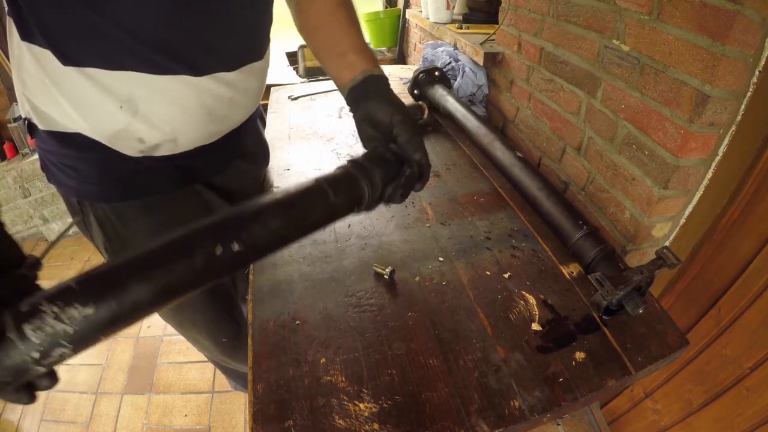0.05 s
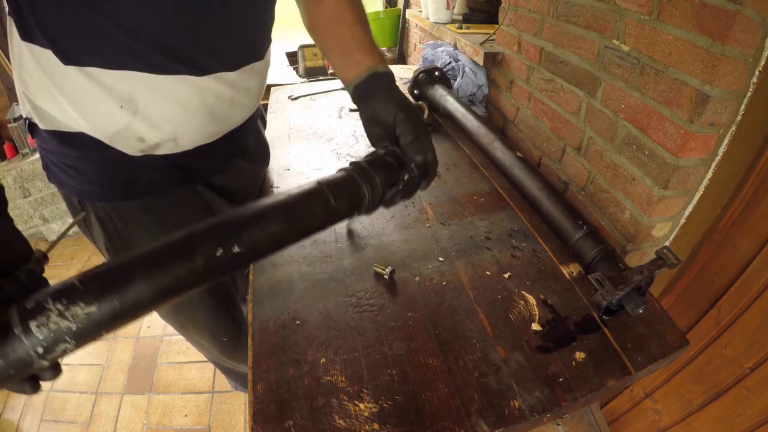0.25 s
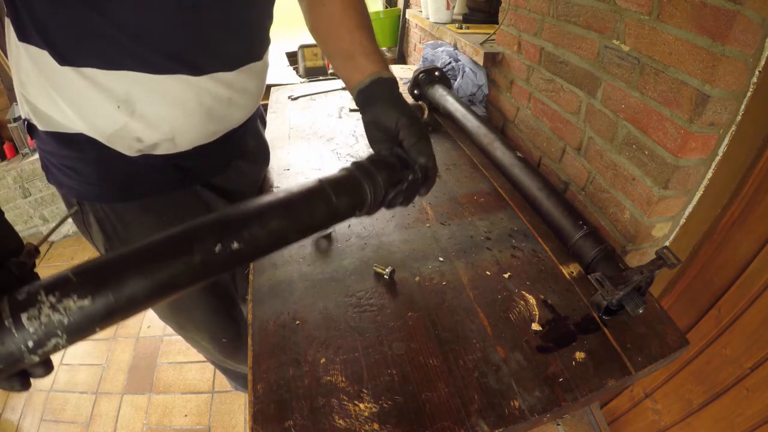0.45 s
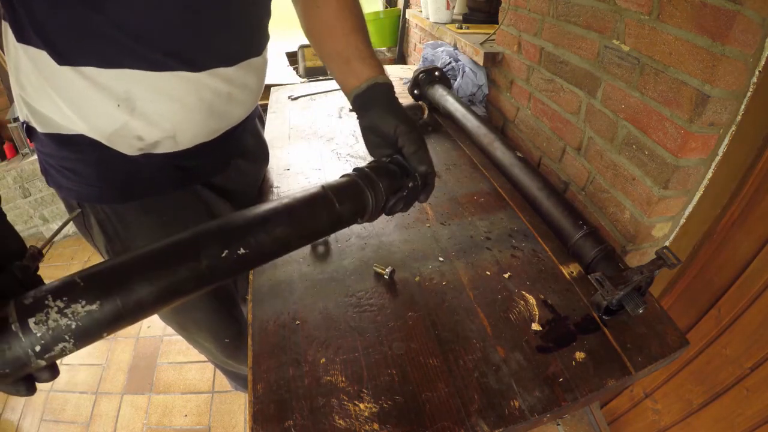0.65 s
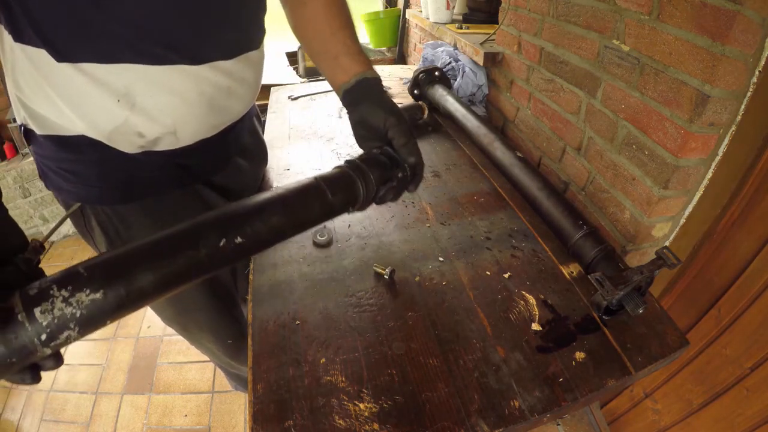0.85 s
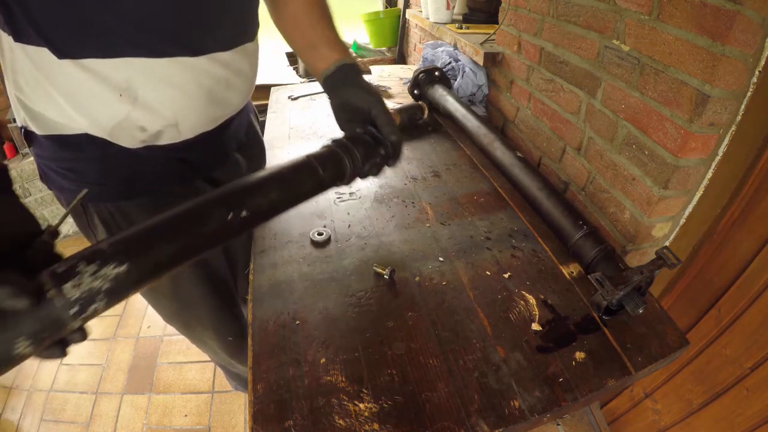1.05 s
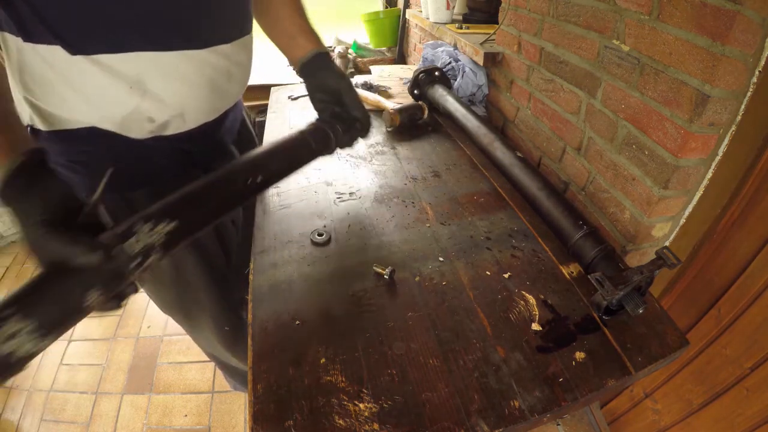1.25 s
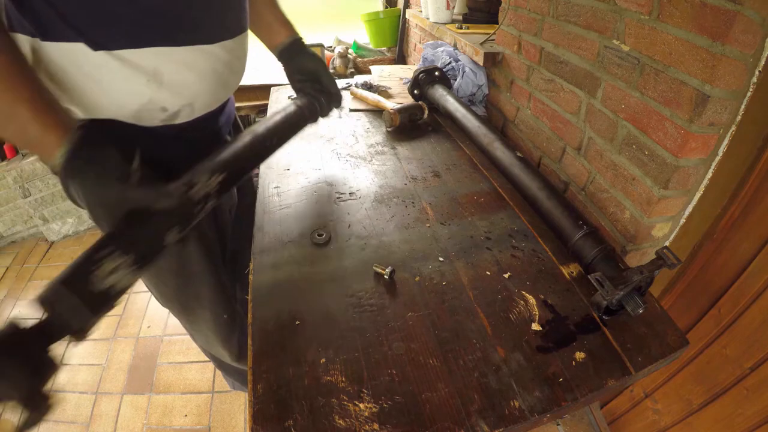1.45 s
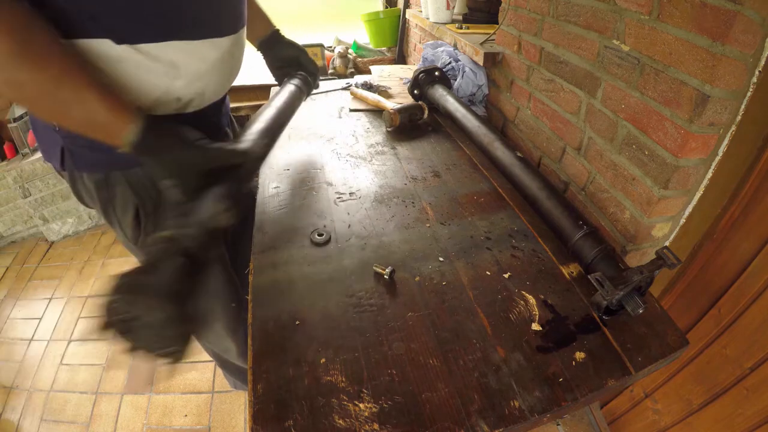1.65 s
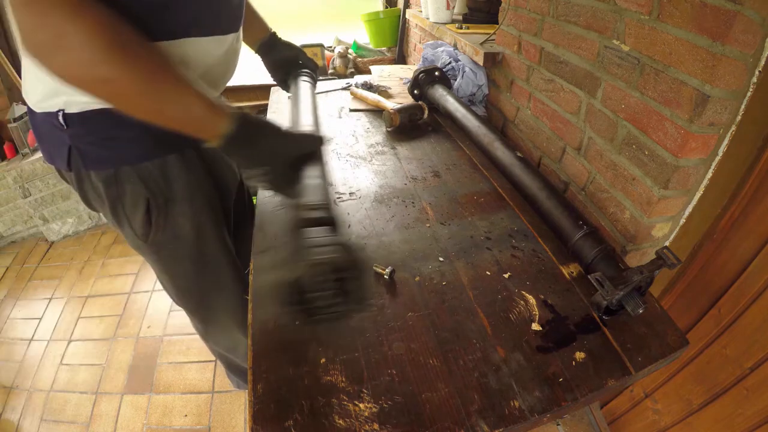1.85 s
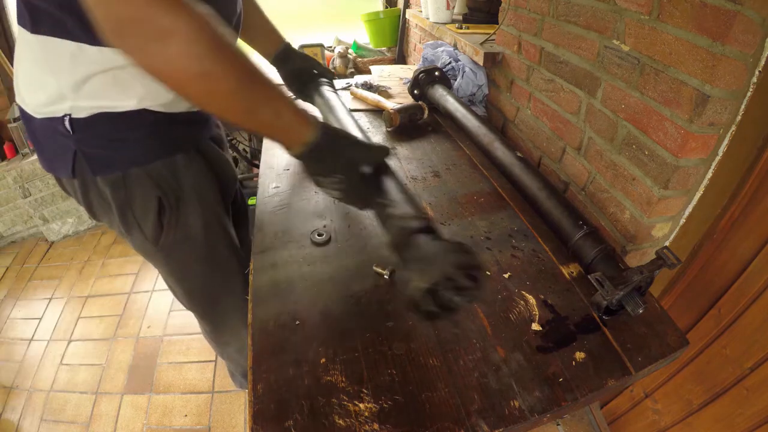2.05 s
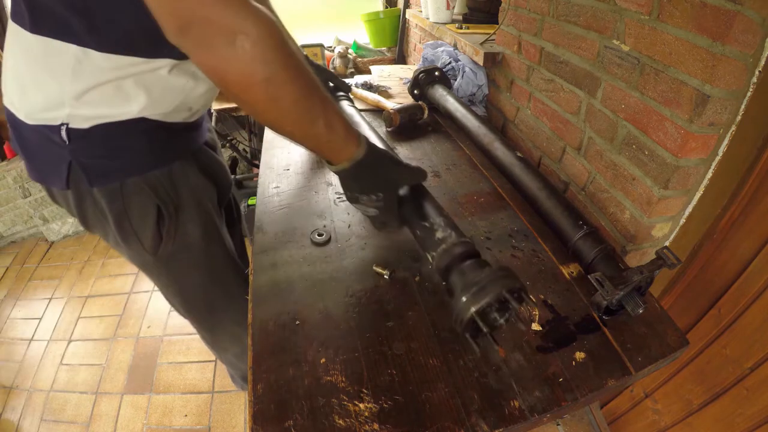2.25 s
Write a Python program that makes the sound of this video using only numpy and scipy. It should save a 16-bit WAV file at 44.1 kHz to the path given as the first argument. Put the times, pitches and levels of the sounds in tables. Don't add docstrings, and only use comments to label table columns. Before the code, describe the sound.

A steel washer falls onto a wooden bench. Over quiet room rumble, hiss and a very faint pulsed electronic whine, a bright clink off a pipe comes at 0.2 s with a softer touch after it. Hard clicks and woody knocks follow at 0.3-0.4 s, then soft rocking rattles until 1.25 s, strongest near 1.0 and 1.2. Short room tail; only background afterwards, with a barely audible dull bump near 2.2 s.

```python
import sys
import numpy as np
from scipy import signal
from scipy.fft import rfft, irfft
from scipy.io import wavfile
from scipy.ndimage import uniform_filter1d

SR = 44100
rng = np.random.default_rng(int(sys.argv[2]) if len(sys.argv) > 2 else 0)


def rack_gain(trim_db):
    fader = np.asarray(trim_db, float)
    return 10 ** (fader / 20)


def put_to_file(sound):
    columns = np.atleast_2d(sound).T
    safe = np.clip(columns, -1, 1)
    whole_steps = np.round(safe * 32767)
    wavfile.write(sys.argv[1], SR, whole_steps.astype(np.int16))


N = 101429

# (frequency [Hz], density [dB per Hz])
FLOOR_SPECTRUM = [(12, -32), (20, 6), (82, -4), (139, -11.5), (205, -14.5), (457, -21), (5850, -30),
                  (13800, -38.5), (15000, -40.5)]
# (time [s], length [s], depth [dB])
HISS_DIPS = [(.035, .025, -5), (.192, .015, -10), (.895, .022, -9), (.96, .022, -5), (1.448, .022, -9),
             (1.568, .045, -12), (1.64, .022, -9), (1.685, .022, -9), (2.11, .024, -9)]
# (frequency [Hz], rise over a burst [Hz], level [dB])
WHINE_TONES = [(14650, 130, -76), (10790, 40, -86)]
# (time [s], level [dB], rise [s], contact length [s], hardness [Hz])
CLINKS = [
    (.2017, -19.5, 0.00013, 0.00014, 10900),
    (.2132, -29.5, 0.00025, 0.00028, 1790),
]
# (time [s], level [dB], rise [s], contact length [s], hardness [Hz])
ROCKS = [(.2975, -33, 0.0013, 0.021, 1740), (.336, -34.5, 0.0024, 0.0076, 3450),
         (.362, -34.5, 0.0019, 0.022, 2940), (.425, -47, 0.0021, 0.041, 1850),
         (.455, -54.5, 0.0046, 0.011, 2310), (.495, -55, 0.0017, 0.021, 1450),
         (.595, -42, 0.0059, 0.025, 1900), (.706, -42, 0.0027, 0.02, 3780),
         (.808, -46, 0.0046, 0.036, 3430), (.902, -42, 0.002, 0.038, 4860),
         (.988, -37.5, 0.0048, 0.014, 4630), (1.056, -41.5, 0.0013, 0.016, 3370),
         (1.1, -55.5, 0.0057, 0.021, 2470), (1.161, -50.5, 0.0062, 0.026, 2310),
         (1.2045, -36.5, 0.0006, 0.015, 4170)]
# (time [s], level [dB], push length [s])
THUMPS = [(0.2984, -38.5, 0.00077), (0.303, -34, 0.0033), (.333, -41, 0.00085), (.362, -37.5, 0.0011),
          (0.438, -44, 0.00086), (.82, -55.5, 0.0034), (0.999, -61, 0.0012), (1.069, -57, 0.00087),
          (1.151, -59, 0.0025), (1.244, -53, 0.0039), (2.189, -50, 0.02)]
# (time [s], level [dB], rise [s], contact length [s], hardness [Hz])
BOUNCES = [(.333, -37.5, 0.00027, 0.00026, 6140), (.361, -21, 0.00022, 0.00021, 5870),
           (.3645, -21.5, 0.00026, 0.00027, 4050), (.369, -27.5, 0.00026, 0.00021, 3770),
           (.398, -42.5, .0003, .0003, 7100)]
# (level [dB], t60 [s])
STEEL_HZ = [1916, 2300, 2859, 3208, 3480, 3763, 4550, 4969, 5590, 6500, 6864, 8059, 9351, 11000]
STEEL_DECAY = [(-16.5, .04), (-5.5, 0.023), (-22, 0.12), (-18, 0.034), (6.5, 0.02), (-8, 0.04), (-6, 0.035),
               (1, 0.019), (-10, 0.033), (-3.5, .02), (-21, 0.16), (-18.5, 0.033), (-33, 0.02),
               (-23.5, .02)]
# (level [dB], t60 [s])
EDGE_HZ = [1836, 2008, 2400, 2794, 3182, 3316, 3575, 3745, 4533, 5000, 5582, 7300, 8400]
EDGE_DECAY = [(-32, 0.13), (-9.5, 0.024), (0, 0.01), (-15, 0.065), (-11, 0.056), (1.5, 0.033), (-14, 0.09),
              (-5.5, 0.062), (-6, 0.034), (-24, 0.027), (-17, 0.044), (-15, 0.041), (-16, .03)]
# (level [dB], t60 [s])
BOARDS_HZ = [474, 790, 921, 1285, 1556, 1760, 2008, 2202, 2380, 2600, 2730, 2865, 3340, 3690]
BOARDS_DECAY = [(-16, 0.16), (-21.5, 0.12), (-14.5, 0.13), (-19, 0.18), (-19.5, 0.16), (-33, 0.049),
                (-37, 0.053), (-16.5, 0.063), (-2, 0.024), (-15, .02), (-11, 0.054), (-9.5, 0.059),
                (-15, .05), (-26, 0.072)]
# (level [dB], t60 [s])
TOP_HZ = [60, 146, 163, 215, 385, 474, 700, 790, 860]
TOP_DECAY = [(-6.5, 1), (0, 0.58), (-0.5, 0.153), (-7.5, 0.066), (-11.5, 0.14), (-8.5, 0.13), (-20.5, 0.14),
             (-3, 0.067), (-17, 0.19)]


def low(x, hz, order=2, kind="low"):
    return signal.sosfilt(signal.butter(order, min(hz, .45 * SR), kind, fs=SR, output="sos"), x)


def walk(rate):
    hold = int(SR / rate)
    steps = np.repeat(rng.standard_normal(N // hold + 1), hold)
    return 1.3 * uniform_filter1d(uniform_filter1d(steps, hold), hold)[:N]


def floor():
    floor_db, hiss_top_hz = -58.5, 15250
    rumble_walk_db, hiss_walk_db = 1.5, .8
    f = np.arange(N // 2 + 1) * SR / N + 1e-3
    hz, density_db = np.array(FLOOR_SPECTRUM).T
    spectrum_db = np.interp(np.log(f), np.log(hz), density_db) - 22 * (f > hiss_top_hz)
    spectrum = rfft(rng.standard_normal(N)) * rack_gain(spectrum_db)
    out = 0
    shared = walk(29.79)
    for octave in range(10):
        share = np.clip(1 - np.abs(np.log2(f / 30) - octave), 0, 1)
        if octave < 4:
            db = rumble_walk_db * walk(8.36)
        else:
            db = hiss_walk_db * shared * octave / 9 + .5 * walk(11.97)
        out = out + rack_gain(db) * irfft(spectrum * share, N)
    return out * rack_gain(floor_db) / out.std()


def chatter():
    center_hz, level_db, walk_db = 6120, -86, 2.5
    edges_hz = [center_hz - 300, center_hz + 300]
    band_pass = signal.butter(2, edges_hz, "band", fs=SR, output="sos")
    band = signal.sosfilt(band_pass, rng.standard_normal(N))
    return band / band.std() * rack_gain(level_db + walk_db * (walk(6.5) + walk(150)))


def whine():
    period_s, start_s, on_s = 1001 / 15000, .0075, .036
    progress = (np.arange(N) / SR - start_s) % period_s / on_s
    gate = (progress < 1) * (np.abs(progress - .5) > .03) * 1.
    gate = uniform_filter1d(gate, 40)
    tones = np.zeros(N)
    for hz, rise_hz, db in WHINE_TONES:
        cycles = np.cumsum(hz + rise_hz * np.minimum(progress, 1)) / SR
        tones += rack_gain(db) * np.sqrt(2) * np.sin(2 * np.pi * cycles)
    return gate * tones


def starved(x):
    t = np.arange(N) / SR
    db = sum(depth_db * np.exp(-((t - s) / length * 2) ** 4) for s, length, depth_db in HISS_DIPS)
    treble = signal.sosfiltfilt(signal.butter(1, 3500, "high", fs=SR, output="sos"), x)
    return x + (rack_gain(db) - 1) * treble


def table(hz, rows):
    return [(f, *row) for f, row in zip(hz, rows)]


def ring(x, modes):
    out = 0
    for hz, db, t60 in modes:
        pole = np.exp(2j * np.pi * hz / SR - np.log(1000) / (t60 * SR))
        out = out + rack_gain(db) * signal.lfilter([1], [1, -pole], x).imag
    return out


def tail(t60, hz):
    t = np.arange(SR // 4) / SR
    noise = low(rng.standard_normal(len(t)), hz) * rack_gain(-60 * t / t60)
    return noise / np.sqrt(np.sum(noise ** 2))


def rattle(events, modes, crack_db, tail_db, t60, tail_hz, per_s):
    click_scatter_db, strike_scatter_db, detune = 2, 1.5, .004
    crack_t60_s = 0.017
    out, t = np.zeros(N), np.arange(SR // 3) / SR
    for s, db, rise, length, hz in events:
        chance, side, size = rng.random((len(t), 3)).T
        heights = np.sign(side - .5) * rack_gain(-click_scatter_db * np.log(size + 1e-9))
        clicks = (chance < per_s / SR) * heights
        clicks[0] = 2
        fade = np.exp(-(np.maximum(t - rise, 0) / length) ** 2)
        shape = np.minimum((t + 1 / SR) / rise, 1) * fade
        force = low(clicks * shape, hz)
        force *= rack_gain(db) * np.sqrt(np.sum(shape ** 2) / np.sum(force ** 2))
        scatter = rng.standard_normal((len(modes), 2))
        spot = [(f * (1 + detune * a), d + strike_scatter_db * b, r)
                for (f, d, r), (a, b) in zip(modes, scatter)]
        dense = signal.fftconvolve(force, tail(t60, tail_hz))[:len(t)]
        crack = signal.fftconvolve(force, tail(crack_t60_s, 20000))[:len(t)]
        i = int(s * SR)
        out[i:i + len(t)] += 0.056 * ring(force, spot) + rack_gain(crack_db) * crack + rack_gain(tail_db) * dense
    return out


def washer():
    clink = rattle(CLINKS, table(STEEL_HZ, STEEL_DECAY), crack_db=-22.5,
                   tail_db=-6.5, t60=0.18, tail_hz=6400, per_s=0)
    bounce = rattle(BOUNCES, table(EDGE_HZ, EDGE_DECAY), crack_db=-12.5,
                    tail_db=-15.0, t60=0.088, tail_hz=5900, per_s=0)
    pipe_s, pipe_hz, pipe_db, pipe_t60_s = .211, 378, -46.5, 0.072
    tap = 1. * (np.arange(N) == int(pipe_s * SR))
    pipe = ring(low(tap, 1300), [(pipe_hz, pipe_db, pipe_t60_s)])
    return low(clink, 1520, order=3, kind="high") + low(bounce, 1410, kind="high") + pipe


def bench():
    t = np.arange(N) / SR
    knock = rattle(ROCKS, table(BOARDS_HZ, BOARDS_DECAY), crack_db=-17.5,
                   tail_db=-8.5, t60=0.091, tail_hz=2930, per_s=5600)
    knock = low(knock, 593, kind="high")
    push = np.zeros(N)
    for s, db, length in THUMPS:
        pulse = np.sin(np.pi * np.clip((t - s) / length, 0, 1)) ** 2
        push += rack_gain(db) * pulse / (length * SR / 2)
    return rack_gain(-7.0) * knock + ring(push, table(TOP_HZ, TOP_DECAY))


def room(x):
    level_db, t60_s, top_hz, build_up_s = -11.5, 0.25, 4900, 0.015
    build_up = np.clip(np.arange(SR // 4) / SR / build_up_s, 0, 1) ** 2
    late = tail(t60_s, top_hz) * build_up
    return rack_gain(level_db) * signal.fftconvolve(x, late)[:N]


def scene():
    under = starved(floor()) + whine() + chatter()
    near = washer() + bench()
    return (near + room(near) + under)[None]


def band_limit(x):
    return signal.sosfilt(signal.butter(12, 16530, fs=SR, output="sos"), x)


def record(dry):
    mix = low(dry, 15800, order=10)
    return band_limit(mix)


dry = scene()
out = record(dry)
put_to_file(out)
```